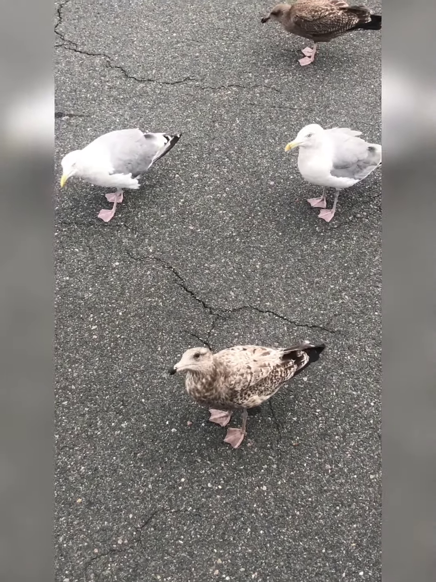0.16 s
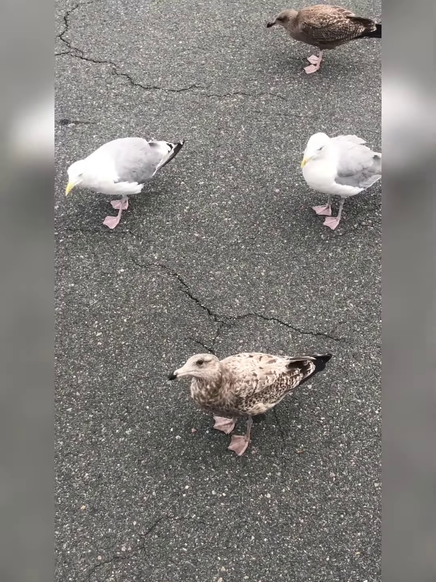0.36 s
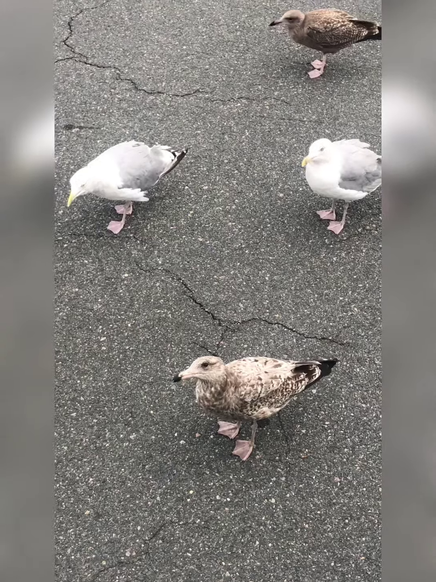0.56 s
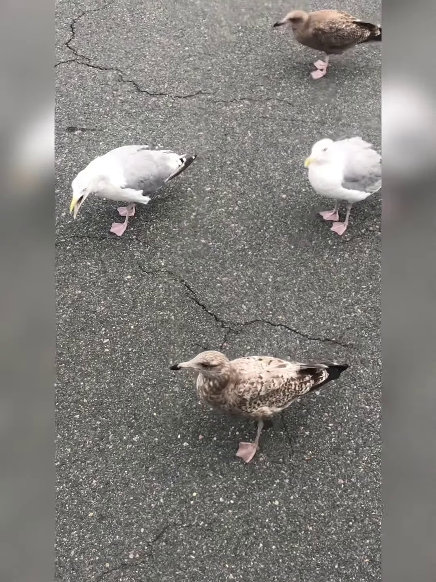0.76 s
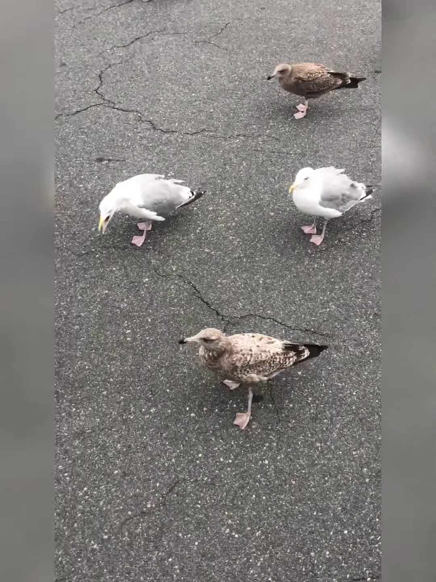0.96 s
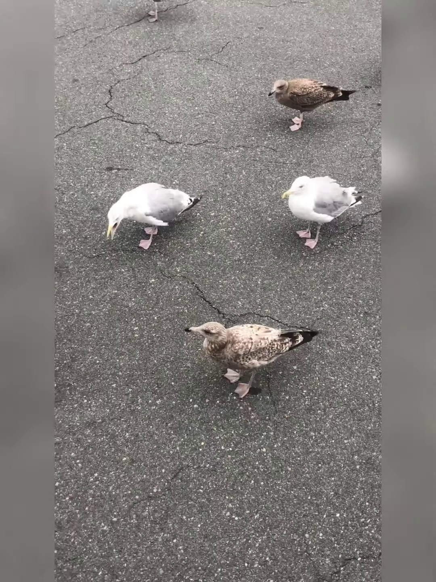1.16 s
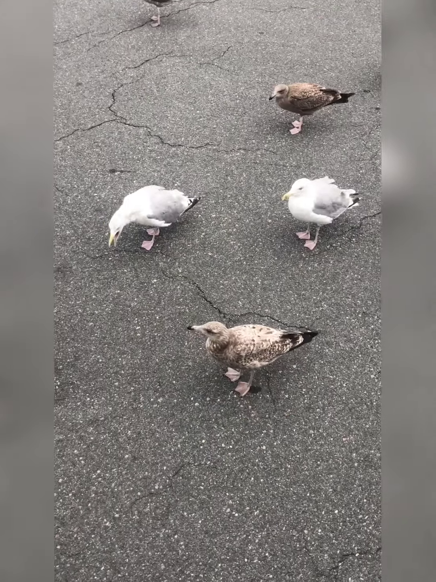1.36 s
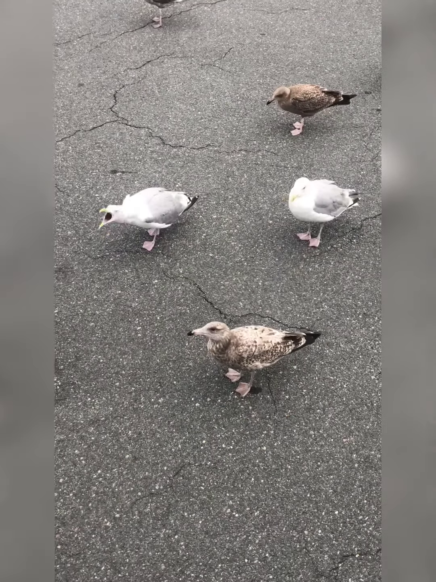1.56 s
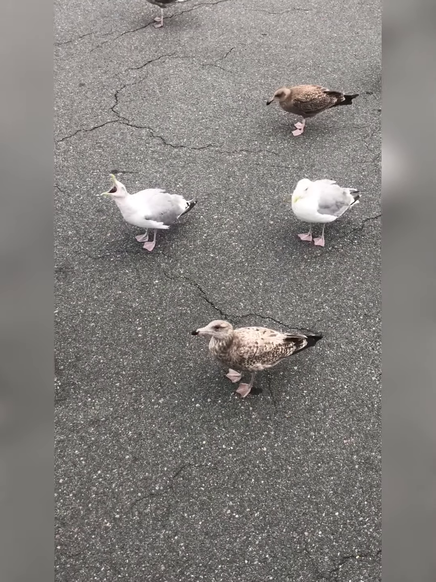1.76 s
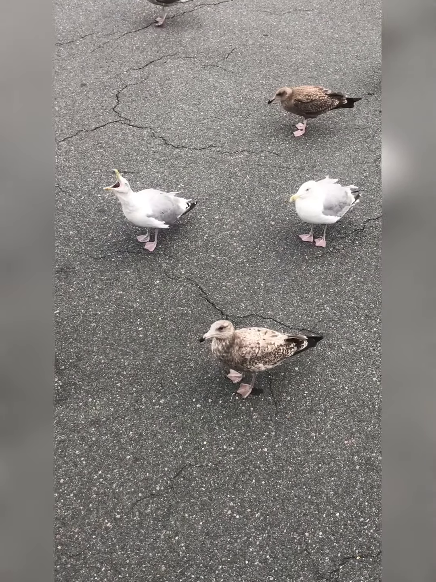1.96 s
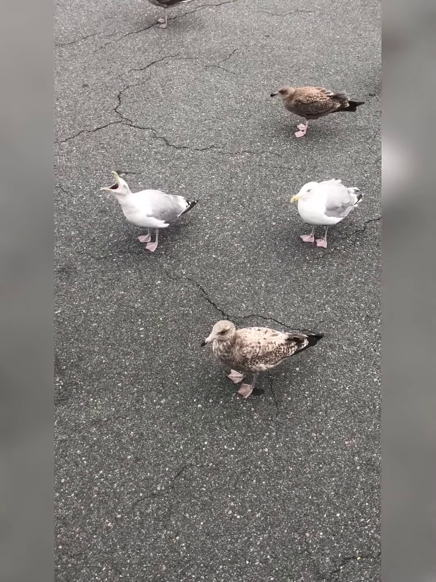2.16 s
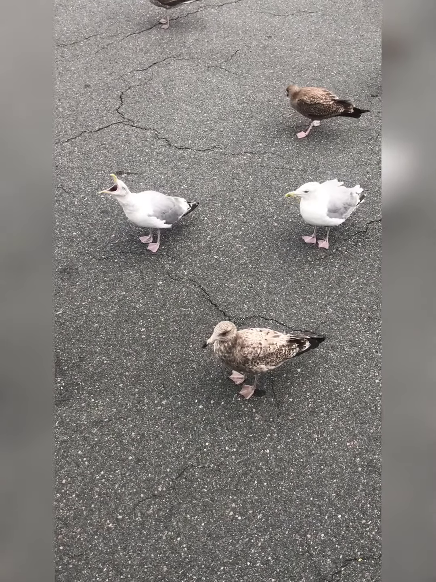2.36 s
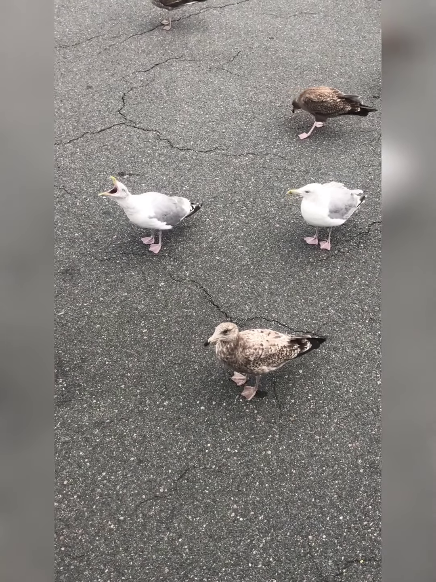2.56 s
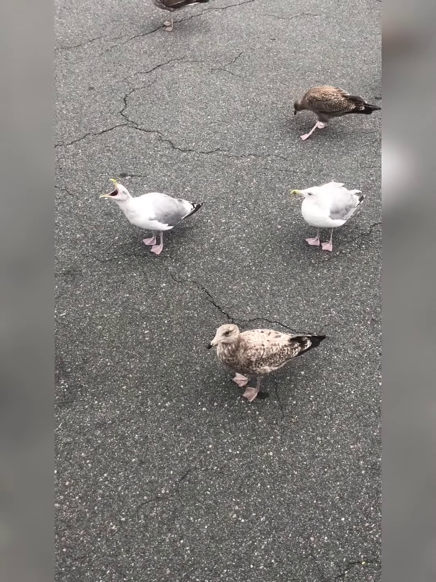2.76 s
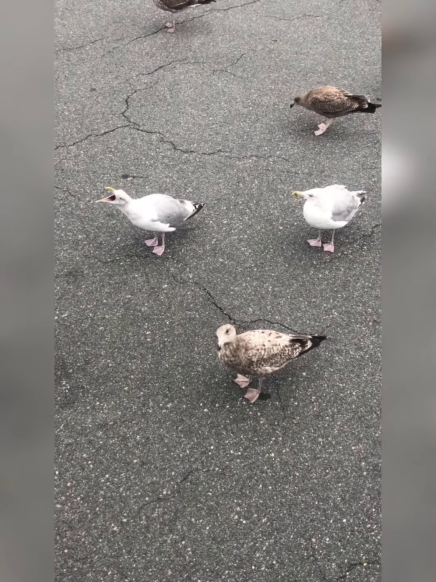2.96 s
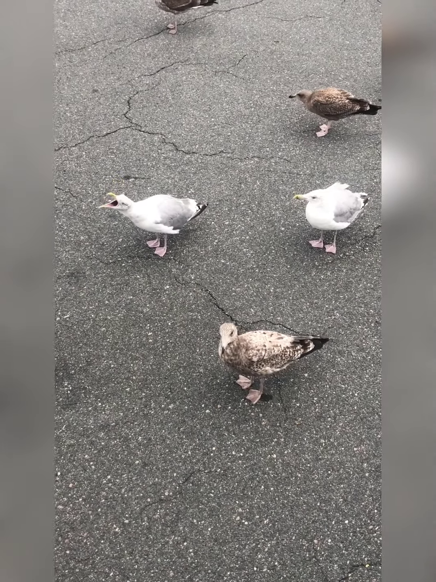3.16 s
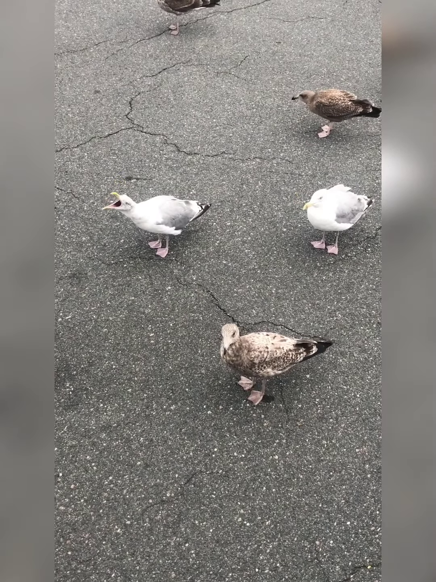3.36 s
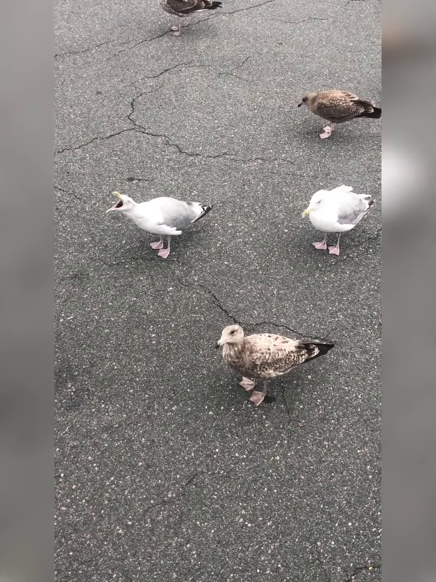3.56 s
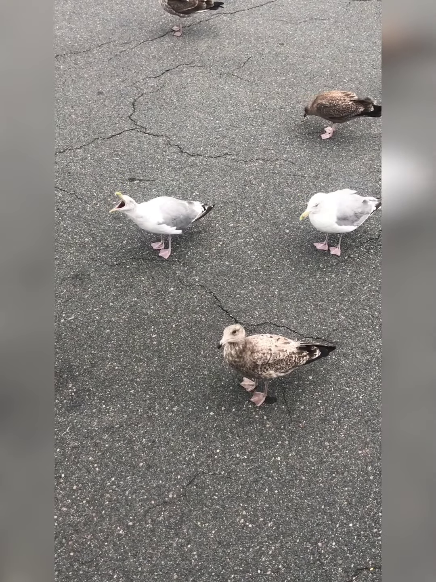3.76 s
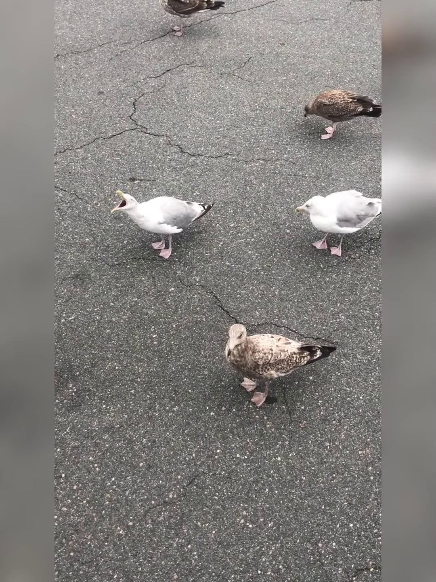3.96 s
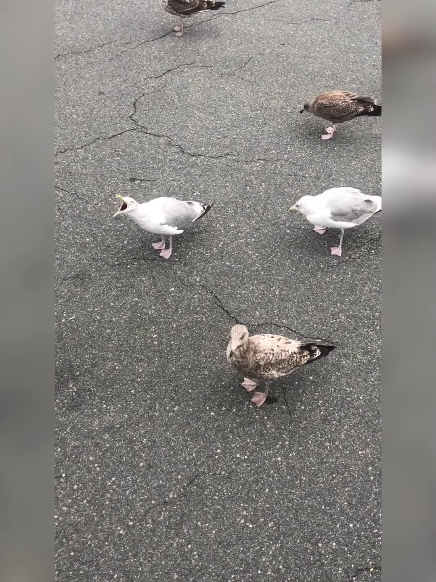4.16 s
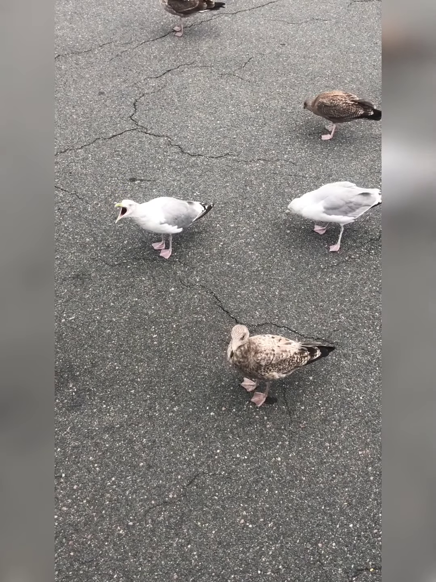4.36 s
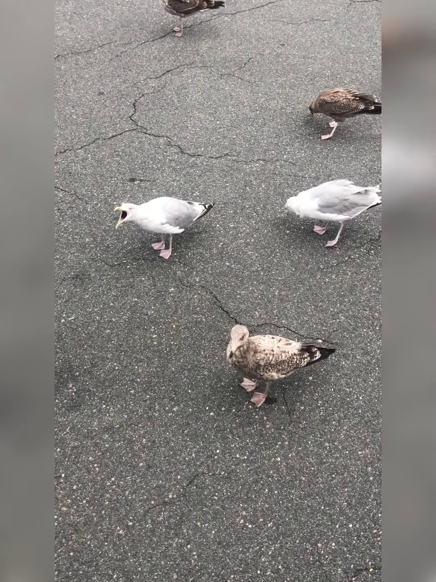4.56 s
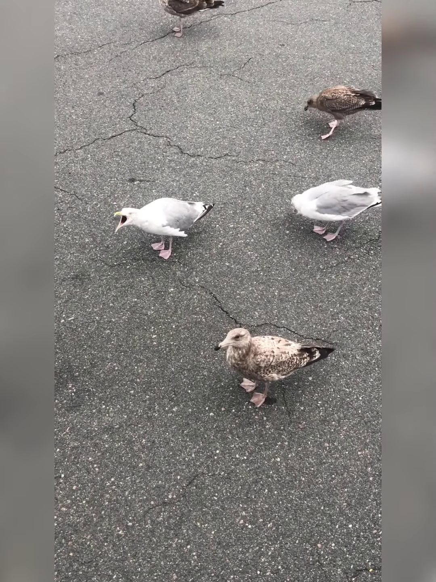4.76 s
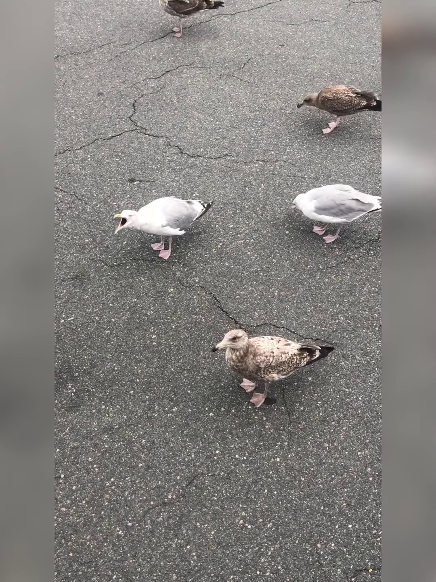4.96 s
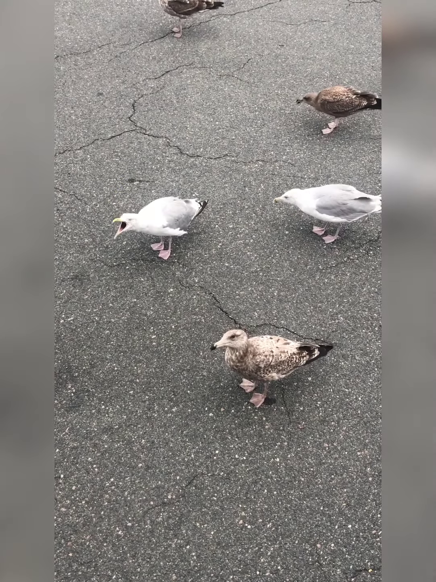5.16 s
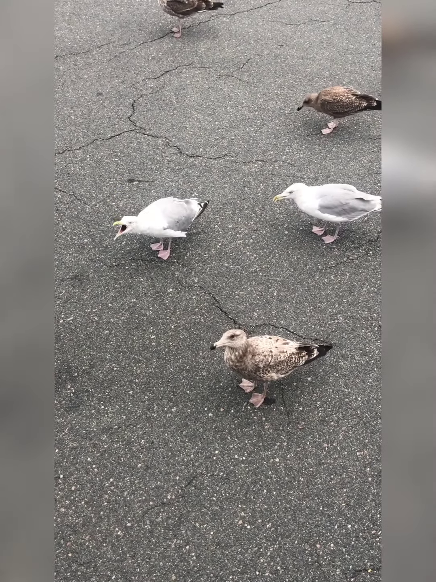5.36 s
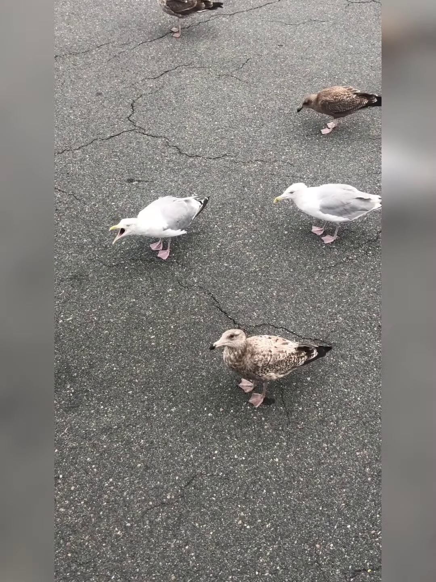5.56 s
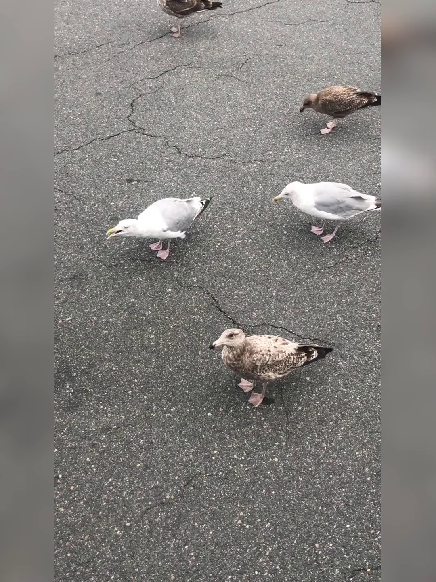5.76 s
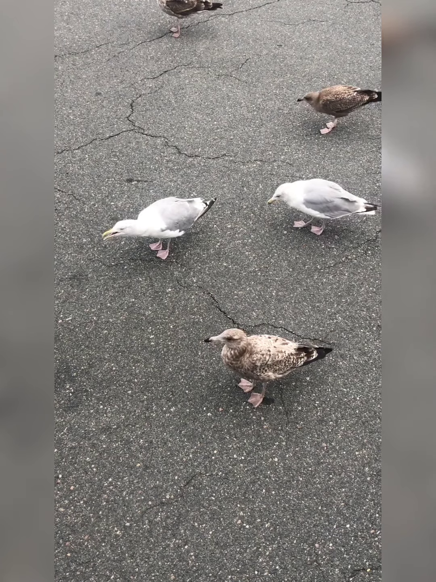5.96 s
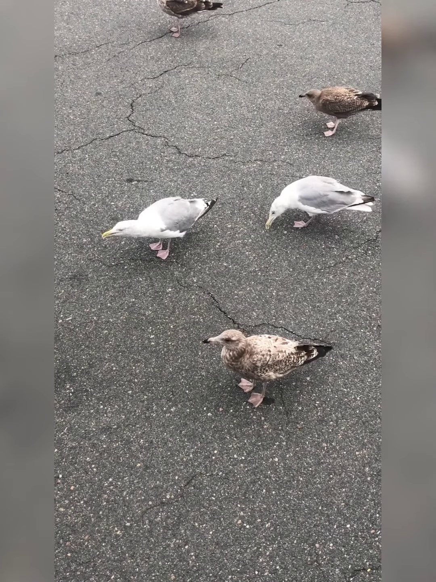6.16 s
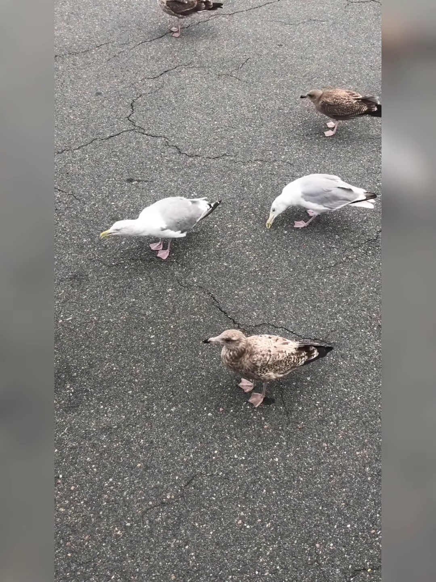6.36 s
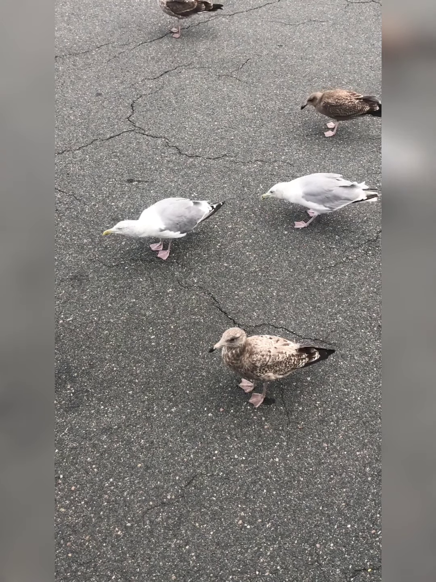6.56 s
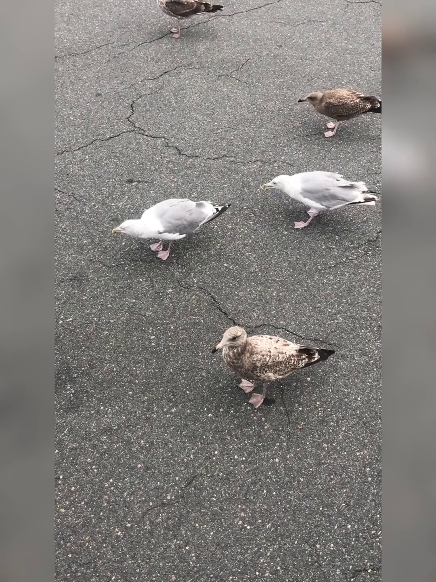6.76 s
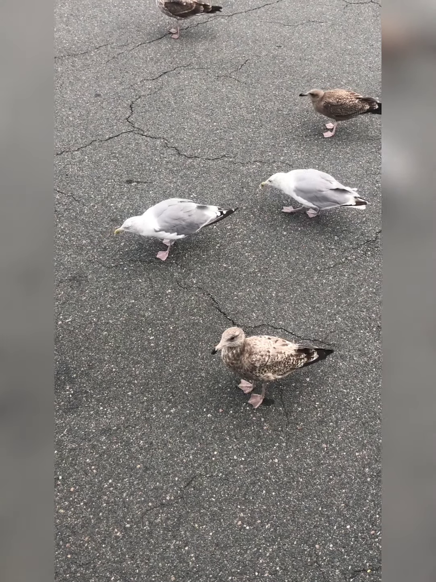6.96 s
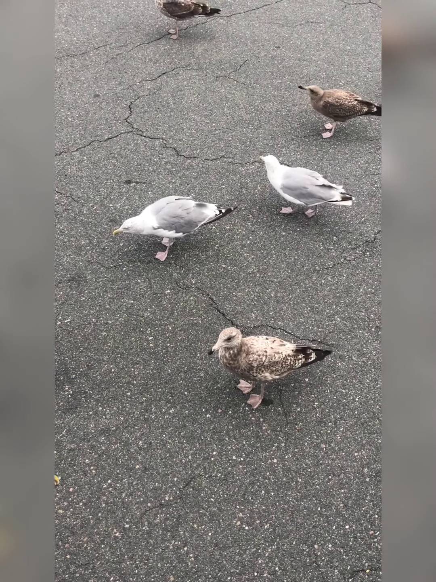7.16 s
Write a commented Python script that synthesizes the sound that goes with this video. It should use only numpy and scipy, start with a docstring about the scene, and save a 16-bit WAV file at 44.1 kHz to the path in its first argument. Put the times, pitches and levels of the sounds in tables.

```python
"""A paved lot, a herring gull close by, gusts rumbling and thumping on the microphone over faint outdoor noise.
The gull opens with a mew, a whistle, a yelp and a scream; the two sides of its syrinx sound alone or
together, clean or rough. Thirteen falling cries follow, each one push of air: a croak, a soft lead-in,
the loud cry and a rough break. Late among them a gull further off calls twice, hoarse and dull. Two wails,
a faint hiss and grunts come last. Young gulls whistle in between; the lot returns a faint echo."""
import sys
import numpy as np
from scipy import signal
from scipy.fft import rfft, irfft, next_fast_len
from scipy.io import wavfile
from scipy.ndimage import uniform_filter1d, map_coordinates

SR = 44100
rng = np.random.default_rng(int(sys.argv[2]) if len(sys.argv) > 2 else 0)


def wrap_up_sound(samples):
    """Save the sound to the file named by the first command line argument, as 16-bit audio."""
    columns = np.atleast_2d(samples).T
    # keep every value between -1 and 1, then stretch to whole-number steps
    tamed = np.clip(columns, -1, 1)
    steps = np.round(tamed * 32767).astype(np.int16)
    wavfile.write(sys.argv[1], SR, steps)


N = 318402

# spectrum of the hardest buffets on the microphone: f/Hz, level/dB
SLAP = [(150, -20.5), (350, 6), (650, -1), (1100, -14), (2200, -37.5), (5000, -77), (15000, -69)]


def gull(coupling_db=-6):
    """Both sides of the syrinx share one airflow, so together they make sum and difference tones."""
    low, high = long_call()
    low = low_side(low)
    high = high_side(high)
    flow = np.sqrt(np.abs(uniform_filter1d(low ** 2 + high ** 2, size=220)) + 1e-9)
    colour = [(900, -40), (2000, 0), (3500, 0), (5500, -9), (8000, -22), (15000, -32)]  # f/Hz, level/dB
    combination_tones = filtered(low * high / flow, lambda hz: amp(along(colour, hz)))
    return low + high + amp(coupling_db) * combination_tones


def long_call():
    """Thirteen notes as two tracks: the low side croaks, drones and breaks, the high side cries."""
    # end t/s, croak to end t/s, croak level/dB, croak roughness/0-1, lead-in f/Hz, cry f/Hz,
    # then level/dB of the lead-in, the cry's harmonics 1-3, the drone and the break
    notes = [(1.935, 0.21, -25, .7, 1957, 1824, -14.5, -12.5, -14, -30.5, -43, -2),
             (2.216, 0.17, -24, 0.5, 2020, 1820, -25.5, -15.5, -16.5, -29, -3.5, -1.5),
             (2.51, 0.17, -28, 0.7, 2010, 1810, -40, -18, -21, -31.5, 0, -7.5),
             (2.807, .17, -28.5, 0.67, 2087, 1809, -64, -18.5, -17, -31, 0, -0.5),
             (3.106, 0.17, -29, .85, 2044, 1830, -35.5, -22, -15.5, -36.5, -3.5, -0.5),
             (3.413, 0.17, -29, .5, 2080, 1810, -56, -19.5, -15, -34.5, -2.5, 0),
             (3.716, 0.17, -24.5, 0.7, 2010, 1778, -33, -18.5, -14.5, -29.5, -6, -5.5),
             (4.027, 0.17, -27, 0.88, 2020, 1785, -56, -22, -15.5, -30, -5, -4.5),
             (4.326, .16, -27, 0.8, 2050, 1830, -25, -17.5, -14, -27.5, -18, -2.5),
             (4.639, 0.17, -24.5, 0.7, 2075, 1830, -21, -15, -18, -32.5, -36, 1.5),
             (4.954, 0.17, -21.5, 0.43, 2075, 1812, -24, -14, -16.5, -31, -23, -3.5),
             (5.276, .161, -21, 0.35, 2093, 1833, -26.5, -13.5, -14, -31.5, -20, 0),
             (5.594, 0.16, -22, 0.38, 2117, 1851, -34.5, -15.5, -16.5, -35.5, -21.5, 1)]
    # drone under the lead-in, break after the cry: t/s from note end, f/Hz, harmonics 1-3/dB, roughness/0-1
    drone_shape = [(-.158, 1218, -31.5, -40, -41, 0.5), (-.142, 1233, -23, -29, -59, 0.02),
                   (-.11, 1256, -26, -32, -43, 0.07), (-.085, 1285, -29, -37.5, -62, .2),
                   (-.066, 1335, -48, -52, -80, 0.4)]
    break_shape = [(-.013, 1573, -43, -34, -56, 0.73), (-.001, 1378, -20, -20.5, -35.5, 0.78),
                   (.005, 1365, -25, -29, -51, .7), (.016, 1300, -55, -59, -55, 0.65)]
    croaks, drones, cries, breaks = [], [], [], []
    for end, length, croak_db, rough, lead_hz, hz, lead_db, *levels_db, drone_db, break_db in notes:
        croaks.append(croak(end - length, croak_db, rough))
        drones.append(placed(drone_shape, end, drone_db))
        cries.append(cry(end - length, end, lead_hz, hz, lead_db, levels_db))
        breaks.append(placed(break_shape, end, break_db))
    low = (sing(croaks, rasp_db=-8, shimmer=.7, top_db=1, stutter_db=6, jitter=.33, grouping=.85)
           + sing(drones, top_db=-6, stutter_db=7)
           + sing(breaks, rasp_db=-1, top_db=2, stutter_db=8.5, grouping=1.0))
    return low, sing(cries, top_db=2, rasp_db=-2, waver=.0045)


def low_side(note_track):
    """The low side's notes, opening calls and wails, plus both gulls' hoarse calls, in one throat colour."""
    # opening calls: t/s, f/Hz, harmonics 1-3/dB, roughness/0-1
    mew = [(0.598, 1380, -42, -40, -55, 0.54), (0.625, 1295, -20, -26, -35.5, 0.03),
           (0.67, 1342, -17.5, -17.5, -32, 0), (0.728, 1315, -13.5, -29, -29, 0),
           (0.745, 1316, -15, -29, -39, 0.27), (0.815, 1275, -17.5, -38, -56.5, 0.4),
           (0.865, 1204, -42, -54, -60, 0.57)]
    yelp = [(1.34, 1340, -39, -43, -61, 0.5), (1.358, 1290, -30, -39, -57, 0.81),
            (1.369, 1328, -8.5, -9.5, -28.5, 0.017), (1.386, 1413, -26, -17, -37, 0.029),
            (1.404, 1404, -19, -19.5, -73, 0.054), (1.426, 1300, -56, -37.5, -59, 0.1)]
    scream = [(1.605, 1648, -20, -46, -42, 0.03), (1.62, 1488, -33, -33, -66, 0.03),
              (1.651, 1523, -17.5, -36, -29.5, 0.18), (1.665, 1420, -14.5, -14, -29.5, 1),
              (1.691, 1422, -24.5, -20, -39, 0.69), (1.705, 1400, -28, -49, -67, 0.54),
              (1.74, 1376, -28.5, -49, -78, 0.6)]
    squawk = [(1.746, 1030, -41.5, -28, -40, 0.21), (1.762, 1170, -20.5, -16.5, -26.5, 0.11),
              (1.771, 1248, -26, -19, -32, 0.11), (1.785, 1266, -33, -25, -42, 0.2)]
    # closing wails: croak t/s, length/s, f/Hz, crescendo/dB per length, harmonics 1-3/dB
    wails = [(5.782, 0.15, 1448, 18.5, -12, -20.5, -23.5), (6.18, 0.15, 1440, -0.5, -17, -19, -32)]
    # colour of the throat: f/Hz, gain/dB
    throat = [(400, -32), (750, -8.5), (1050, 0), (4100, -1), (4800, -1.5), (5600, -1.5), (9500, 0),
              (12500, -2.5), (15000, -5)]
    low = (note_track + sing([mew], rasp_db=11, stutter_db=9, jitter=.99)
           + sing([yelp, squawk], rasp_db=-5.5, top_db=-1)
           + sing([scream], rasp_db=-7, stutter_db=1.5)
           + hoarse_calls()
           + sing([croak(row[0], db=-22, rough=.87) for row in wails], rasp_db=-19.5, top_db=-6)
           + sing([wail(*row) for row in wails], top_db=-9, rasp_db=-4))
    return filtered(low, lambda hz: amp(along(throat, hz)))


def high_side(note_track):
    """The high side adds its opening calls to its notes: mostly clean tones, then a crack into a scream."""
    # opening calls: t/s, f/Hz, harmonics 1-3/dB, roughness/0-1
    mew = [(0.625, 1915, -40, -51, -57, 0.03), (0.67, 2008, -46, -44.5, -51.5, 0.03),
           (0.73, 1962, -41, -33, -60, 0.03), (0.8, 1900, -36, -53, -52, 0.4),
           (0.83, 1850, -29, -61, -52, 0.81), (0.865, 1876, -22, -75, -46, 0.067),
           (0.888, 2000, -36, -66, -78, 0.03)]
    whistle = [(0.899, 2640, -46.5, -74, -86, 0.03), (0.92, 2538, -20.5, -46, -55, 0.013),
               (0.961, 2550, -19, -52.5, -64, 0.01), (0.996, 2558, -18, -54, -67, 0.02),
               (1.017, 2490, -12, -53, -76, 0.056), (1.035, 2330, -56, -58, -53, 0.3)]
    squeal = [(1.412, 2020, -43, -72, -80, 0.047), (1.429, 1963, -28.5, -63, -52, 0.015),
              (1.502, 1939, -17.5, -41.5, -69.5, 0.0093), (1.551, 1944, -18, -39, -55, 0.015),
              (1.59, 2050, -25.5, -41, -54.5, 0.029), (1.6, 1900, -28, -48, -57, 0.032)]
    crack = [(1.592, 2560, -22, -60, -74, 0.03), (1.598, 2470, -9.5, -27, -49, 0.039),
             (1.609, 2390, -15.5, -27, -36, 0.034), (1.613, 2370, -15, -45, -33, 0.03)]
    scream = [(1.606, 1945, -19, -31, -44, 0.1), (1.617, 1859, -29, -15, -30.5, 0.14),
              (1.645, 1836, -28, -13.5, -31, 0.1), (1.661, 1836, -21, -19.5, -43, 1),
              (1.679, 1825, -26.5, -28, -31, 1)]
    return (note_track + sing([mew, whistle, squeal], top_db=1.5, waver=.0014)
            + sing([crack, scream], top_db=2, rasp_db=-3, stutter_db=2))


def croak(s, db, rough, hz=1165):
    """The rough catch of the low side that opens a note."""
    # course of the croak: t/s from its peak, pitch/ratio, level/dB
    shape = [(-.035, 1.1, -38.5), (-.014, .96, -12.5), (0, 1, 0.5), (.005, 1.02, -5), (0.014, 1.2, -16)]
    return np.array([(s + dt, hz * ratio, db + rise, db + rise - 1, db + rise - 10.5, rough)
                     for dt, ratio, rise in shape])


def cry(croak_s, end, lead_hz, hz, lead_db, levels_db, cry_s=.073, sag=.106, release_s=.029,
        catch_db=-29, catch_s=.013):
    """The high side catches after the croak, holds a soft lead-in, then swells and falls in an S."""
    start, onset = croak_s + .024, end - cry_s
    t = np.linspace(start, end, 120)
    progress = np.clip(1 - 2 * (end - t) / cry_s, -1, 1)  # -1 until the cry starts, 1 at its end
    early = np.clip((onset - t) / cry_s, 0, 1)  # falls to 0 as the cry starts
    straight = .54 + .15 * rng.standard_normal()  # each cry bends a little differently
    slide = straight * progress + (1 - straight) * progress ** 3
    pitch = (hz - slide * np.where(progress < 0, lead_hz - hz, sag * hz)) * (1 - .0151 * early)
    catch = catch_db + effort(t, start, start + catch_s, catch_s / 2, catch_s / 2)
    lead_in = lead_db - 5 * early + effort(t, start, end - cry_s / 2, catch_s, release_s)
    soft = np.maximum(lead_in, catch)[:, None] + [0, -7, -35]  # harmonics 1-3/dB
    loud = harmonics(effort(t, onset, end, .025, release_s), levels_db)
    rough = .017 + .41 * np.exp((t - end) / .0013)
    return np.column_stack([t, pitch, np.maximum(loud, soft), rough])


def wail(croak_s, length, hz, crescendo_db, *levels_db, knee=.38, rise=.05, fall=.29, peak=.68):
    """A long note of the low side: it nearly holds its pitch, then sinks and frays as the air runs out."""
    progress = np.linspace(0, 1, 80)
    t = croak_s + .018 + progress * length
    sinking = np.maximum((progress - knee) / (1 - knee), 0) ** 1.25
    pitch = hz * (1 - rise * np.maximum(knee - progress, 0) - fall * sinking)
    push = effort(t, t[0], t[-1], attack_s=.014, release_s=.05)
    push += crescendo_db * np.minimum(progress - peak, 0)
    rough = .015 + .5 * np.exp((t - t[-1]) / .0093)
    return np.column_stack([t, pitch, harmonics(push, levels_db), rough])


def hoarse_calls():
    """Hoarse gull calls: the close gull's grunts and two duller ones from a gull further off."""
    # t/s, length/s, start f/Hz, end f/Hz, arch/share of pitch, harmonics 1-3/dB, roughness/0-1, overtones/dB
    calls = [(1.015, 0.067, 1413, 1132, .04, -17, -32.5, -47, 1, 10.5),
             (4.858, 0.14, 1313, 1280, .01, -33, -47, -38, 0.4, -4),
             (4.958, 0.15, 1450, 1340, 0.008, -36.5, -42.5, -43, 0.6, 0),
             (6.733, 0.095, 1492, 1604, 0.013, -36.5, -38, -42.5, 1, 3.5),
             (7.02, 0.11, 1322, 1168, 0.02, -36, -44, -38.5, 0.75, -4.5)]  # the further gull calls from 4.86 to 5.1 s
    return sum(sing([glide(row, attack_s=.025, release_s=.035)], rasp_db=top_db - 7.5, top_db=top_db,
                    jitter=.4, grouping=.75, waver=.015, stutter_db=6) for *row, top_db in calls)


def syrinx(rows, shimmer=.11, waver=.0036, rasp_db=-6, top_db=0, stutter_db=4, jitter=.42, grouping=.34):
    """One side of the syrinx; when rough, its cycles fall into uneven threes and turbulence grows."""
    # upper overtones: harmonic number, level/dB re the third
    overtones = [(4, -8), (5, -13.5), (6, -21.5), (7, -21.5), (8, -24.5), (12, -32)]
    # turbulence in the throat: f/Hz, level/dB
    rasp = [(700, -40.5), (1250, -0.5), (1900, -19.5), (2500, 7), (3500, -13), (4600, -22.5), (5800, 0.5),
            (7600, -3.5), (10000, -14), (12500, -21), (15000, -25)]
    times, *columns = np.transpose(rows)
    t = np.arange(times[0], times[-1], 1 / SR)
    size = len(t)
    pitch, first, second, third, rough = (np.interp(t, times, column) for column in columns)
    phase = 2 * np.pi * np.cumsum(pitch * (1 + waver * wobble(150.6, size))) / SR
    group_phase = phase / 3 + .7 * wobble(140, size)
    phase += rough * (jitter * wobble(600, size) + grouping * np.sin(group_phase))
    # the overtones shift a little with every opening of the bill
    upper_db = [third + top_db + along(overtones, k) + 4.5 * rng.standard_normal() for k in range(4, 13)]
    tone = sum(amp(db) * np.sin(k * phase) * (k * pitch < SR / 2)
               for k, db in enumerate([first, second, third] + upper_db, 1))
    swell = 1 + rough * np.tanh(shimmer * (wobble(600, size) + 2 * np.cos(group_phase)))
    turbulence = amp(third + rasp_db) * (rough + .025) * noise(rasp, size)
    flutter = amp(.5 * wobble(70, size) + stutter_db * np.minimum(rough, .6) * np.tanh(wobble(190, size)))
    fade = np.clip(np.minimum(t - times[0], times[-1] - t) / .0015, 0, 1)
    return fade * swell * flutter * (np.sqrt(2) * tone + turbulence)


def sing(calls, **timbre):
    """A track of calls in one voice; a call's rows are t/s, f/Hz, harmonics 1-3/dB, roughness/0-1."""
    track = np.zeros(N)
    for rows in calls:
        add(track, rows[0][0], syrinx(rows, **timbre))
    return track


def glide(row, attack_s, release_s):
    """A simple call: one push of air on an arched slide in pitch."""
    start, length, from_hz, to_hz, arch, *levels_db, rough = row
    progress = np.linspace(0, 1, 60)
    t = start + progress * length
    pitch = (from_hz + (to_hz - from_hz) * progress) * (1 + arch * np.sin(np.pi * progress))
    push = effort(t, start, t[-1], attack_s, release_s)
    return np.column_stack([t, pitch, harmonics(push, levels_db), np.full_like(t, rough)])


def effort(t, start, end, attack_s, release_s):
    """Rounded attack, hold and release, in dB."""
    rise = np.clip((t - start) / attack_s, 0, 1)
    fall = np.clip((end - t) / release_s, 0, 1)
    return 20 * np.log10(np.sin(np.pi / 2 * rise) * np.sin(np.pi / 2 * fall) + .001)


def harmonics(effort_db, levels_db, brighten=1.27):
    """Levels of the first three harmonics: the harder the push, the brighter."""
    return np.array(levels_db) + np.outer(effort_db, brighten ** np.arange(len(levels_db)))


def placed(shape, s, db):
    """A call shape moved in time and level."""
    return np.array(shape) + [s, 0, db, db, db, 0]


def young_gulls():
    """Peeps and thin, strained begging whistles."""
    # a peep sweeps up, flips down and sags: t/s from its start, f/Hz, harmonics 1-3/dB, roughness/0-1
    peep_shape = [(0, 3600, -44, -45, -57.5, .1), (.01, 4300, -51, -36.5, -59, .1),
                  (.016, 4700, -47, -49, -65, .1), (.019, 3380, -33.5, -47, -58.5, .1),
                  (.028, 3270, -27.5, -30.5, -62, .1), (.048, 3040, -46, -58, -72, .1),
                  (.08, 2930, -59, -41.5, -70, .1)]
    # peeps: t/s, gain/dB
    peeps = [(0.329, -2), (1.999, -2), (5.832, -0.5)]
    # whistles: t/s, length/s, start f/Hz, end f/Hz, arch/share of pitch, harmonics 1-3/dB, roughness/0-1
    begs = [(.457, 0.037, 3430, 3690, -.01, -31, -43.5, -60, 0.11),
            (.485, .3, 3610, 3510, .005, -45.5, -59, -63, .15),
            (.485, .33, 4390, 4040, -0.012, -45.5, -59, -78, .15),
            (.5, 0.31, 5370, 5140, .01, -48, -64, -72, .15),
            (2.21, .22, 4650, 4350, -0.064, -48, -63.5, -76, 0.3),
            (4.8, 0.11, 3340, 3180, -0.06, -39.5, -56, -70, .1),
            (5.96, 0.036, 3480, 3710, -0.05, -31.5, -42.5, -56, .1),
            (5.986, 0.16, 4250, 4070, .04, -43.5, -62, -72, 0.15),
            (5.99, 0.23, 3400, 3390, 0.048, -47, -63, -65.5, .2),
            (5.999, .17, 4680, 4800, .1, -47.5, -66, -77, .35),
            (6.94, 0.2184, 3380, 3120, -0.021, -41.5, -55, -57, 0.3),
            (7.158, 0.02, 3950, 4050, .005, -35.5, -51, -60, 0.2),
            (7.173, 0.12, 4660, 4540, -0.0035, -40.5, -47, -64, 0.2)]
    whistles = [glide(row, attack_s=.0085, release_s=.012) for row in begs]
    return (sing([placed(peep_shape, s, db) for s, db in peeps])
            + sing(whistles, waver=.0044, jitter=1.3, stutter_db=12))


def wind(breeze_db=-40.5, attack_s=.01, release_s=.016, lump_db=4.5, slap_growth=1.98):
    """Eddies on the microphone: the stronger the gust, the higher its rumble reaches."""
    # gusts: t/s, length/s, level/dB
    gusts = [(0.01, 0.077, -19.5), (0.454, 0.14, -34), (1.037, .33, -24), (1.096, 0.084, -14.5),
             (1.247, 0.082, -16.5), (1.406, .24, -24.5), (1.703, 0.083, -22.5), (1.866, .16, -31.5),
             (2.199, 0.027, -18), (2.326, .07, -23), (2.401, 0.17, -9), (2.592, 0.21, -26.5),
             (2.948, 0.011, -25.5), (3.104, 0.43, -25.5), (3.176, 0.07, -17), (3.29, 0.019, -14.5),
             (3.592, 0.057, -29.5), (3.828, 0.1, -18.5), (3.992, 0.14, -21.5), (4.595, 0.01, -15),
             (4.664, 0.018, -21.5), (4.721, 0.14, -29), (4.986, 0.18, -31), (5.638, 0.065, -22),
             (5.689, 0.165, -21.5), (6.24, 0.1, -33.5), (6.451, .11, -26.5), (6.63, 0.013, -18)]
    # spectrum of the rumble: f/Hz, level/dB
    buffet = [(18, -36), (32, -5.5), (60, 3), (100, 2.5), (170, 5), (260, -0.5), (480, -7), (750, -17),
              (1300, -53), (2500, -83)]
    t = np.arange(N) / SR
    push = np.full(N, amp(breeze_db))
    for start, length, db in gusts:
        outside = np.maximum((start - t) / attack_s, (t - start - length) / release_s)
        push = np.maximum(push, amp(db) * np.exp(-np.clip(outside, 0, 20)))
    push_db = 20 * np.log10(push)
    lumps = unit(amp(lump_db * wobble(70, N)))
    slap = amp(-32.5 + slap_growth * (push_db + 17.5)) * noise(SLAP, N)
    rumble = noise(buffet, N)
    # within a gust the push of the air stays within bounds
    rumble = unit(rumble / np.sqrt(1 + np.abs(signal.hilbert(rumble)) ** 2 / 3.6))
    return lumps * (amp(push_db - 3) * rumble + slap)


def thumps(start_hz=750, end_hz=170, drop_s=.0036, swing_t60=.061, puff_t60=.024, snap_t60=.0065):
    """A sharp eddy hits the microphone port: a snap, a puff and a pressure swing that drops in pitch."""
    # eddies: t/s, level/dB, snap/dB re that level
    eddies = [(1.096, -11, 2.5), (1.139, -23, -20), (1.25, -25.5, -15), (1.27, -9.5, -6), (1.311, -14, -13),
              (1.462, -14.5, -20), (2.013, -20, -18), (2.305, -18, -20), (2.387, -1, -10),
              (2.408, -14.5, -5), (2.437, -1.5, 6.5), (2.486, -7.5, 11), (2.553, -9, 6), (2.561, -3.5, 8),
              (3.175, -2, -1.5), (3.183, -10, -5), (3.219, -10, -2.5), (3.288, -5, 1.5), (3.303, -12, -5),
              (3.822, -26, -15), (3.925, -10, 2), (4.053, -16, -31), (4.083, -10, -18), (4.659, -23, 2),
              (4.728, -21.5, -2), (4.755, -11.5, -8), (5.734, -9.5, -12), (5.807, -9.5, -7),
              (6.456, -26.5, -11), (6.625, -18.5, -8)]
    # spectrum of the snap: f/Hz, level/dB
    snap_colour = [(300, 0.5), (1000, 27.5), (2500, -15), (6000, -31.5), (12000, -59)]
    track, t = np.zeros(N), np.arange(SR // 8) / SR
    attack = 1 - np.exp(-t / .0003)
    for (s, db, snap_db), spread in zip(eddies, rng.standard_normal(len(eddies))):
        hz = (end_hz + (start_hz - end_hz) * np.exp(-t / drop_s)) * np.exp(.221 * spread)
        swing = amp(-3 - 60 * t / swing_t60) * np.sin(2 * np.pi * np.cumsum(hz) / SR)
        puff = amp(-12 - 60 * t / puff_t60) * noise(SLAP, len(t))
        snap = amp(snap_db - 60 * t / snap_t60) * noise(snap_colour, len(t))
        add(track, s, amp(db) * (swing + puff + snap) * attack)
    return track


def lot_echo(x):
    """The echo of the open lot; its treble dies first."""
    # decay of the echo: f/Hz, t60/s
    decay = [(300, .4), (2000, 0.34), (4000, 0.27), (10000, 0.19)]
    hz, t, spectrum = signal.stft(rng.standard_normal(SR // 2), SR, nperseg=256)
    tail = signal.istft(spectrum * amp(-60 * t / along(decay, hz)[:, None]), SR, nperseg=256)[1]
    delayed = np.pad(x, (500, 0))
    return signal.fftconvolve(delayed, tail / np.linalg.norm(tail))[:N]


def soft_hiss(db=-57):
    """A faint, brief hiss after the last wail."""
    # spectrum of the hiss: f/Hz, level/dB
    colour = [(1500, -29), (4000, 1.5), (6500, -1.5), (9000, -6.5), (15000, -12.5)]
    swell_db = effort(np.arange(N) / SR, start=6.39, end=6.72, attack_s=.08, release_s=.14)
    return amp(db + swell_db) * noise(colour, N)


def outdoor_air(db=-41.5):
    """The steady, mostly low noise around the lot."""
    # spectrum of the background: f/Hz, level/dB
    colour = [(15, -39), (25, -13.5), (75, 5.5), (210, -6), (744, -15), (1000, -10.5), (1380, -15.5),
              (1580, -19), (3100, -27), (3850, -28.5), (5170, -36.5), (7540, -38.5), (15600, -50.5)]
    return amp(db) * noise(colour, N)


def amp(db):
    """Decibels to gain."""
    return 10 ** (np.asarray(db) / 20)


def unit(x):
    """Scale to rms 1."""
    return x / np.sqrt(np.mean(x ** 2) + 1e-20)


def along(points, hz):
    """Read (f/Hz, value) points on a log axis."""
    f, values = np.transpose(points)
    return np.interp(np.log(hz + 1), np.log(f + 1), values)


def wobble(rate, size):
    """A smooth random curve with rate knots a second."""
    knots = rng.standard_normal(int(size * rate / SR) + 4)
    return map_coordinates(knots, [np.arange(size) * rate / SR])


def filtered(x, response):
    """Apply a gain that depends on frequency."""
    size = next_fast_len(len(x) + 2048)
    return irfft(rfft(x, size) * response(np.fft.rfftfreq(size, 1 / SR)), size)[:len(x)]


def noise(spectrum, size):
    """Coloured noise of rms 1."""
    return unit(filtered(rng.standard_normal(size), lambda hz: amp(along(spectrum, hz))))


def add(track, s, sound):
    """Mix a sound into a track at time s."""
    start = max(round(s * SR), 0)
    track[start:start + len(sound)] += sound[:max(N - start, 0)]


def scene():
    """At one microphone: the birds, their faint echo, a hiss, wind and the outdoor air."""
    birds = gull() + young_gulls()
    air = outdoor_air()
    return (birds + amp(-27.5) * lot_echo(birds) + soft_hiss() + wind() + thumps() + air)[None]


def record(dry, low_cut_hz=42, ceiling=.95, top_hz=15750):
    """The small microphone loses deep bass; the recorder rounds off peaks and cuts the highest treble."""
    heard = filtered(dry[0], lambda hz: hz ** 2 / np.sqrt(hz ** 4 + low_cut_hz ** 4))
    rounded = heard / (1 + np.abs(heard / ceiling) ** 8) ** (1 / 8)
    return filtered(rounded, lambda hz: hz < top_hz)[None]


dry = scene()
out = record(dry)
wrap_up_sound(out)
```